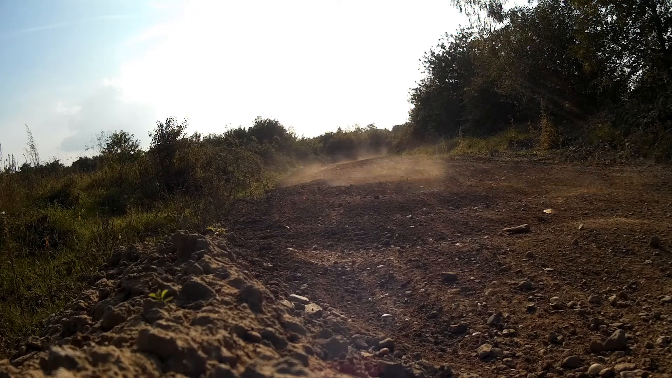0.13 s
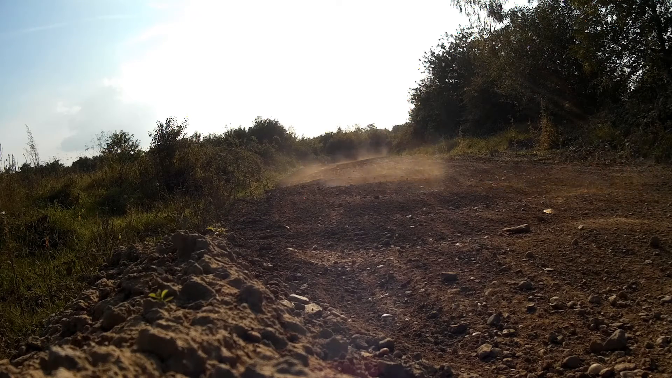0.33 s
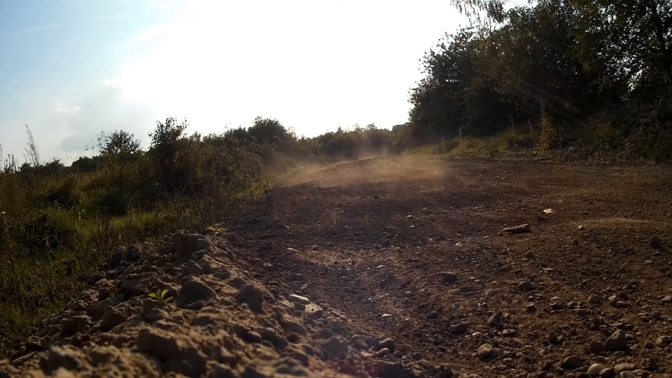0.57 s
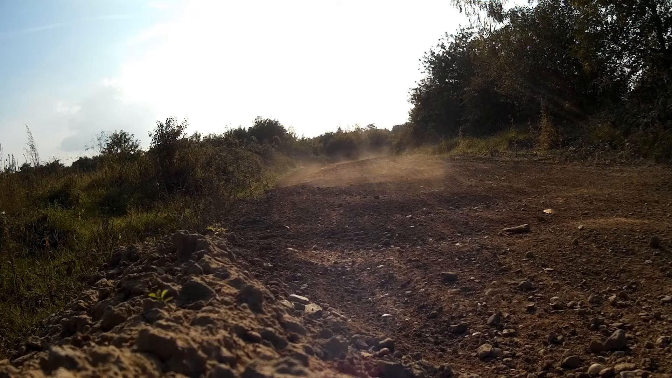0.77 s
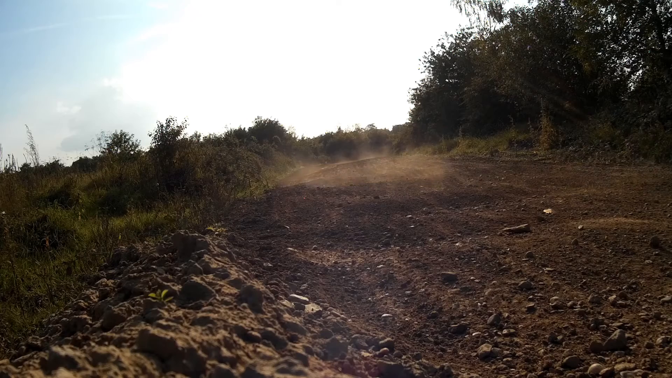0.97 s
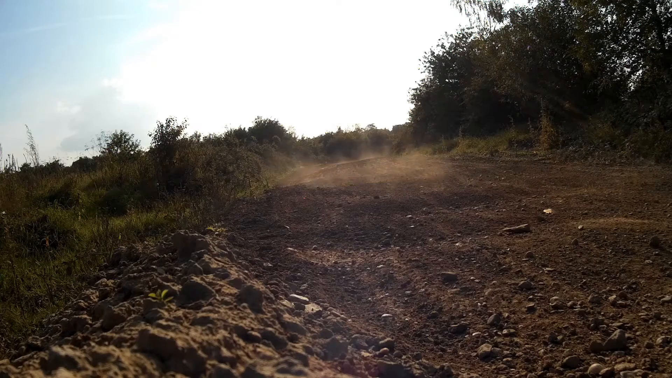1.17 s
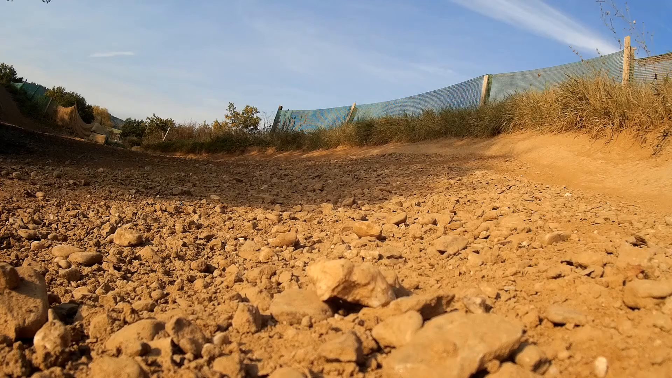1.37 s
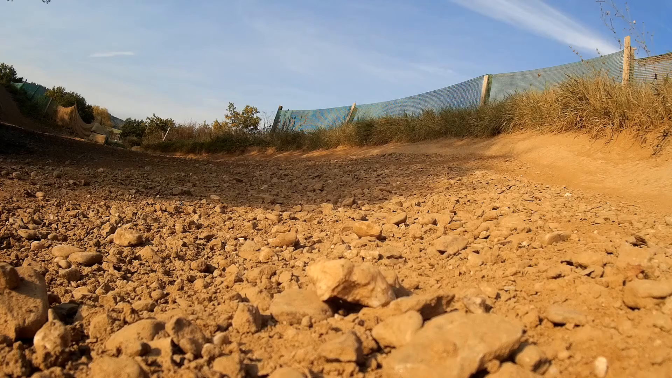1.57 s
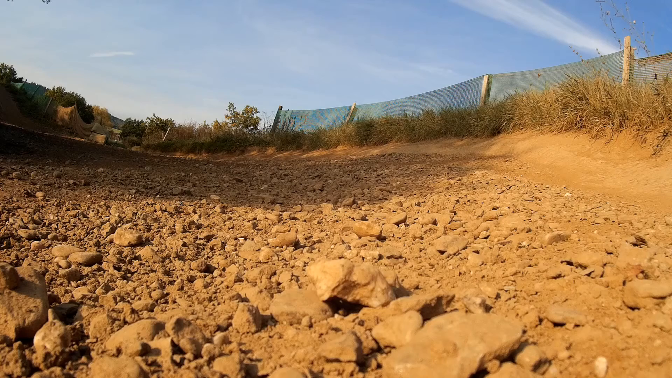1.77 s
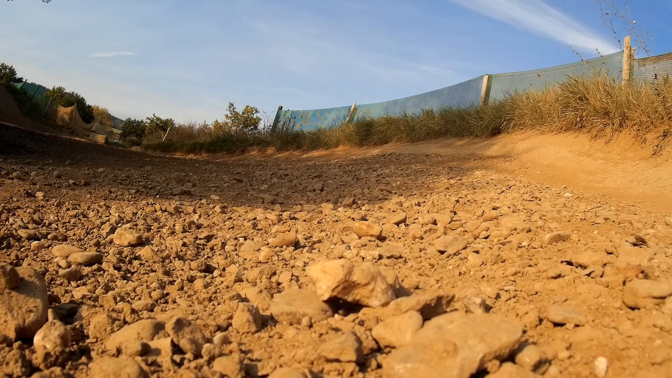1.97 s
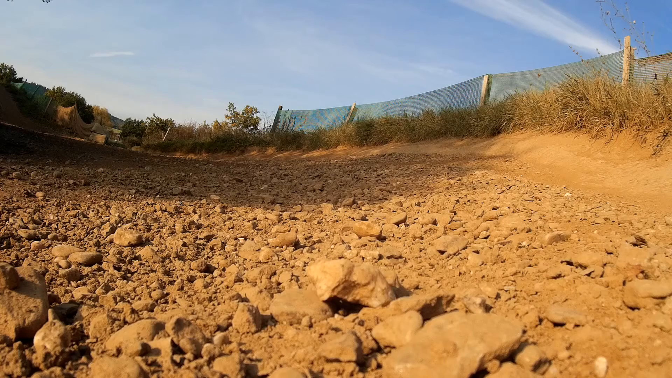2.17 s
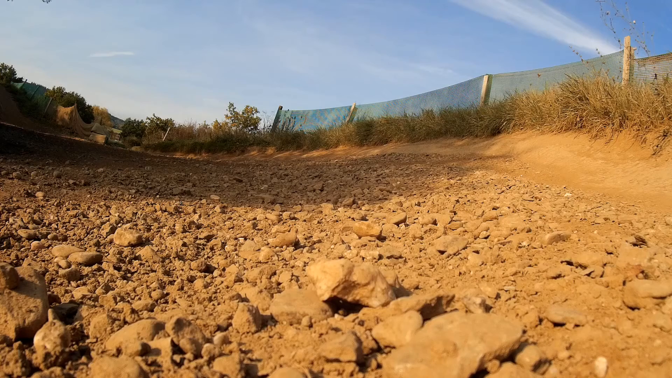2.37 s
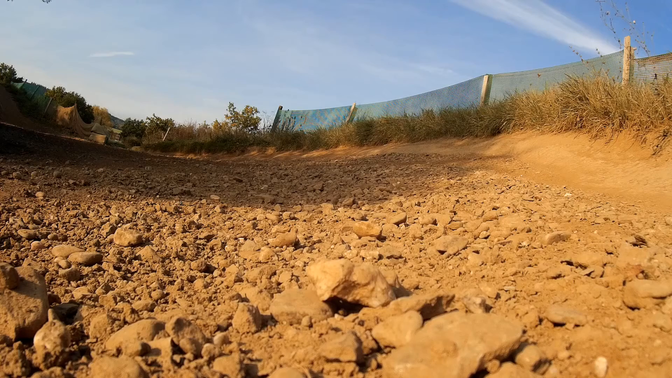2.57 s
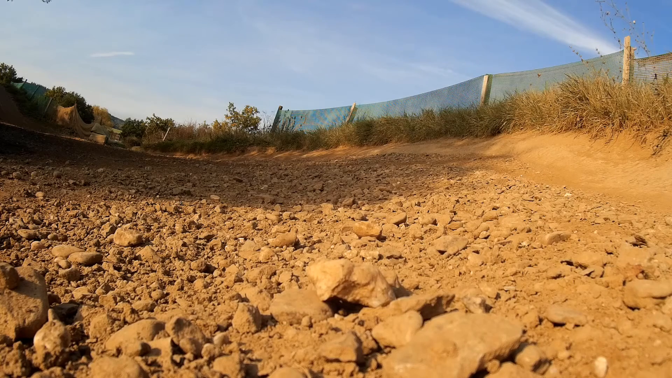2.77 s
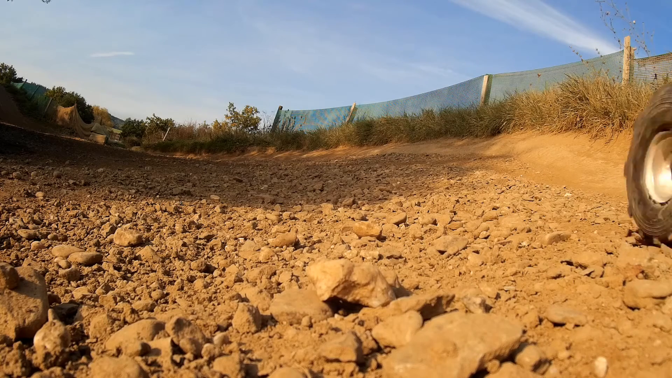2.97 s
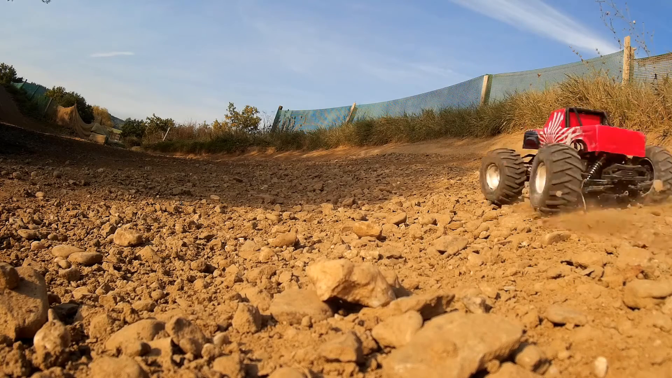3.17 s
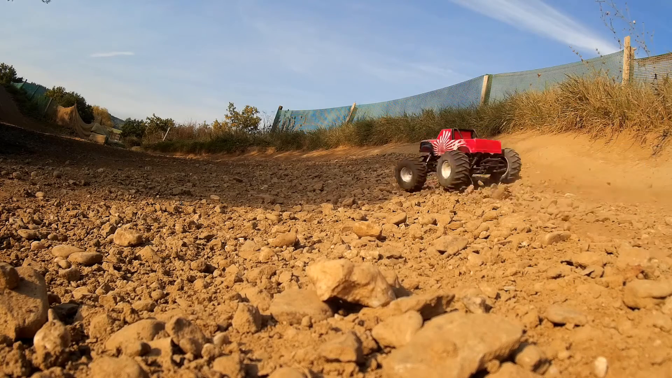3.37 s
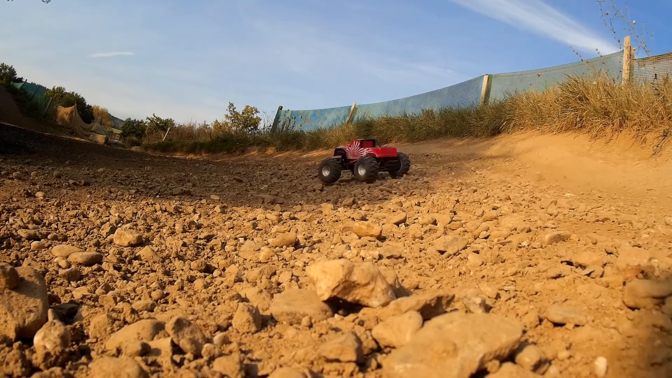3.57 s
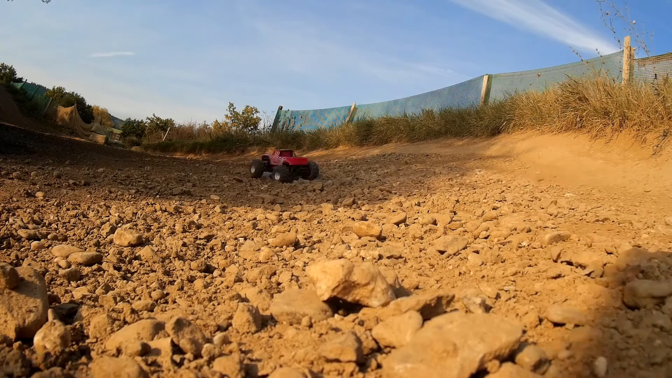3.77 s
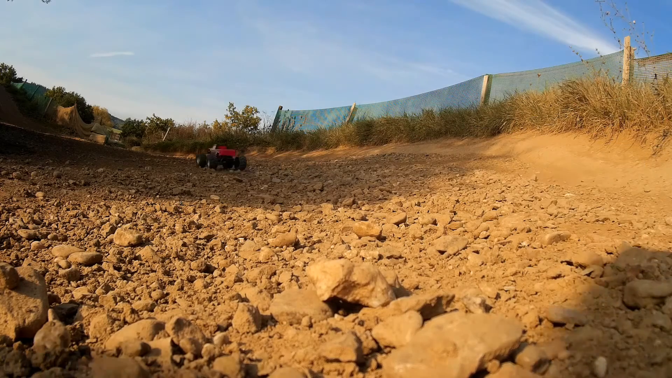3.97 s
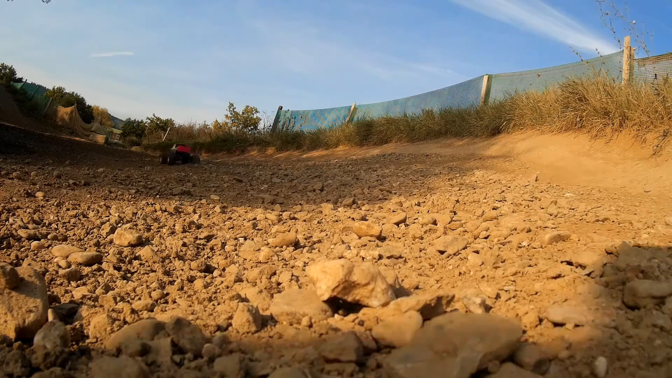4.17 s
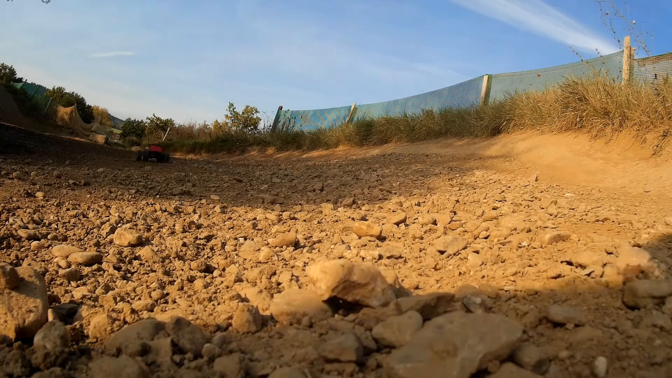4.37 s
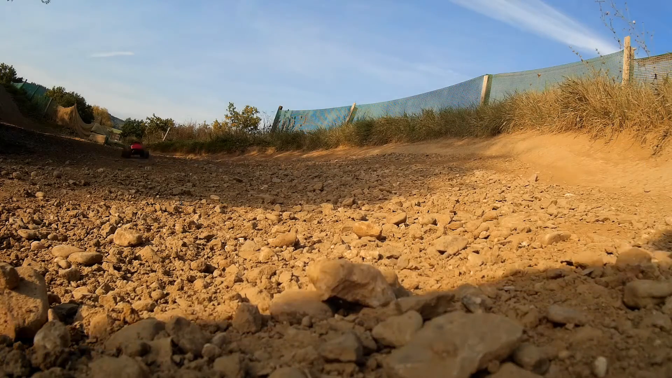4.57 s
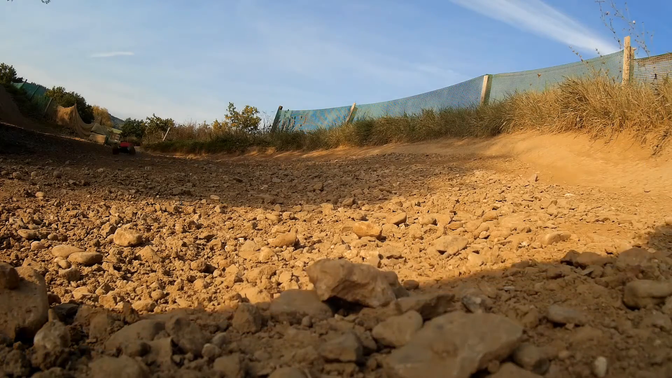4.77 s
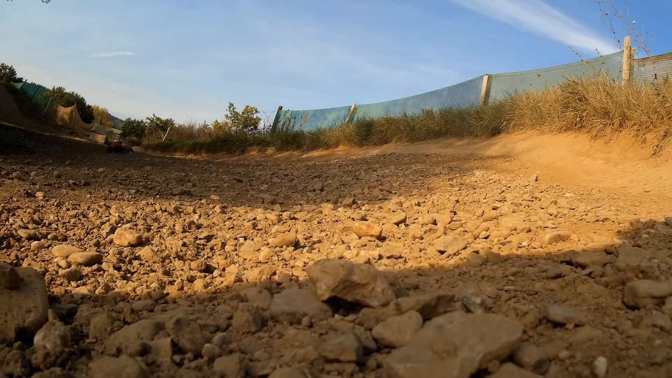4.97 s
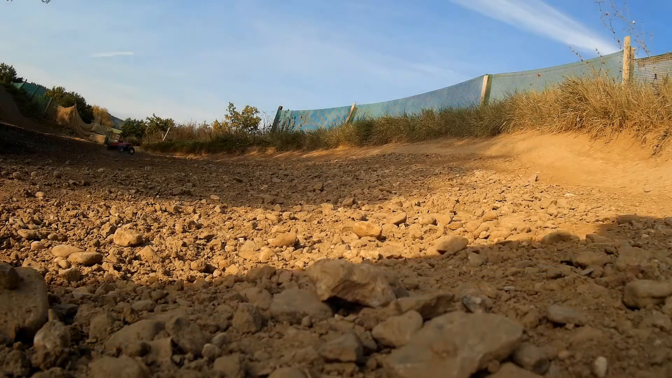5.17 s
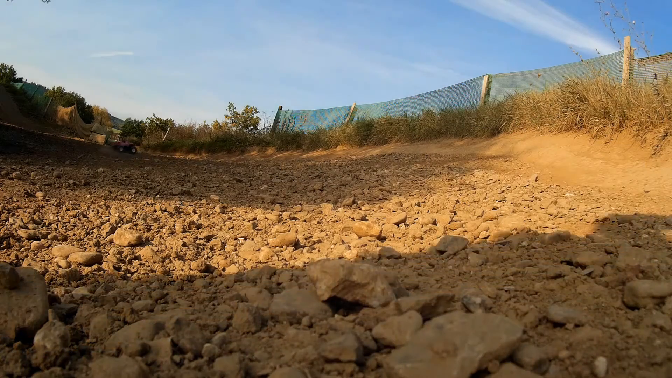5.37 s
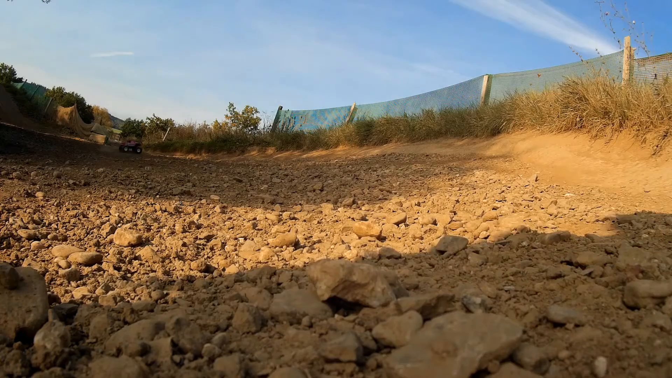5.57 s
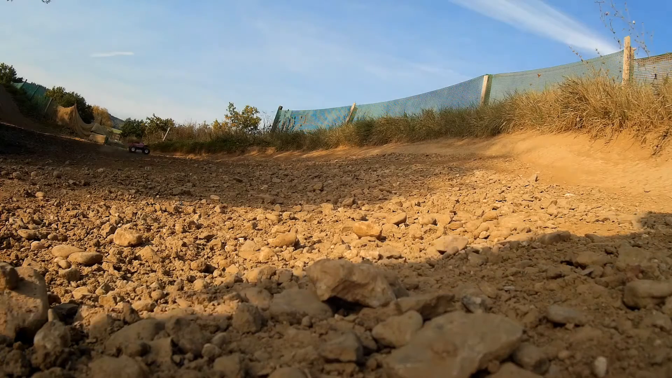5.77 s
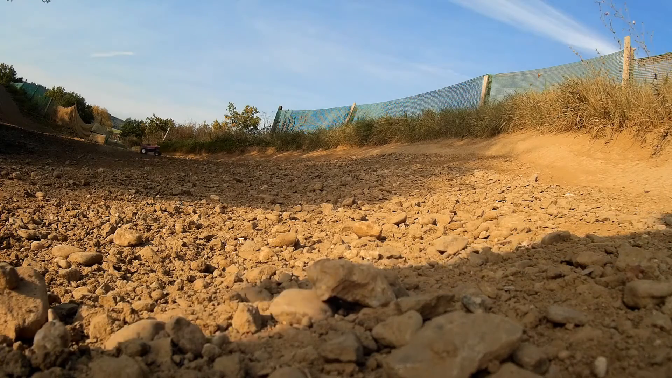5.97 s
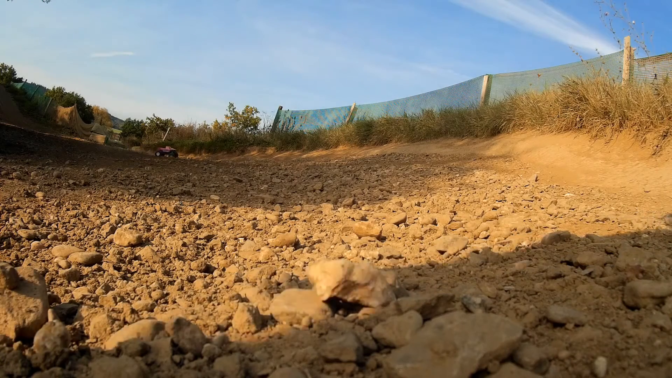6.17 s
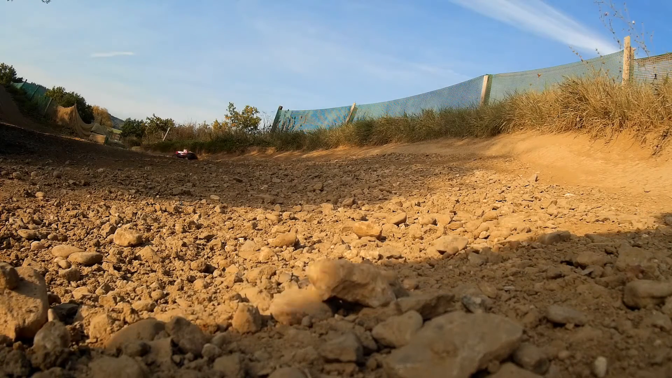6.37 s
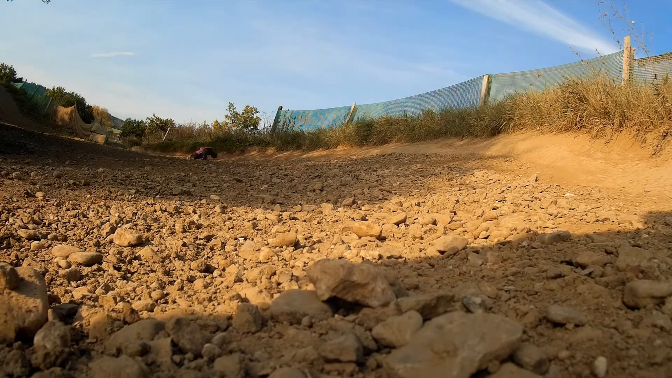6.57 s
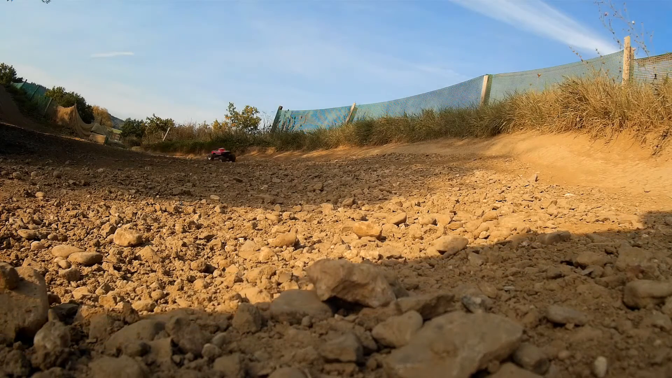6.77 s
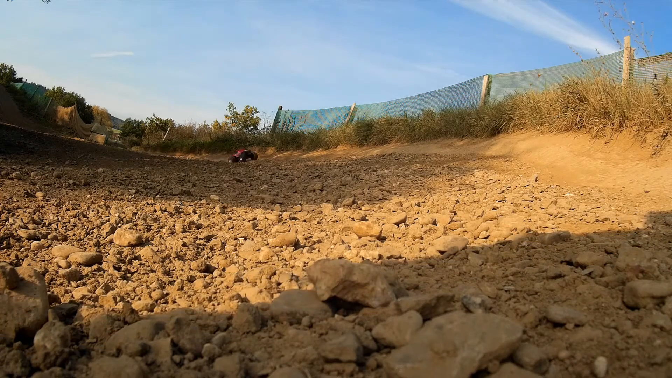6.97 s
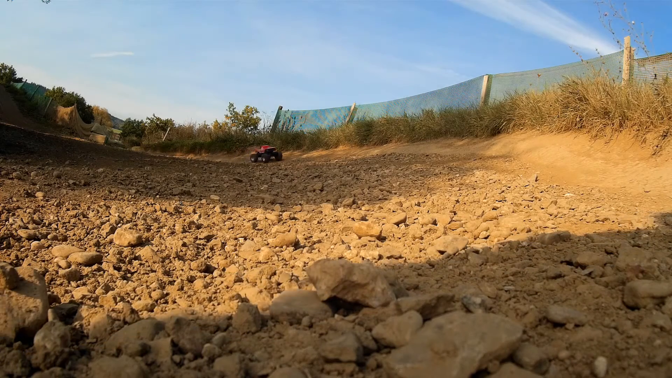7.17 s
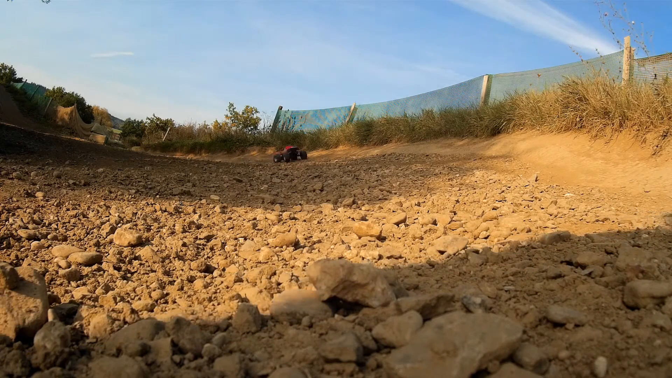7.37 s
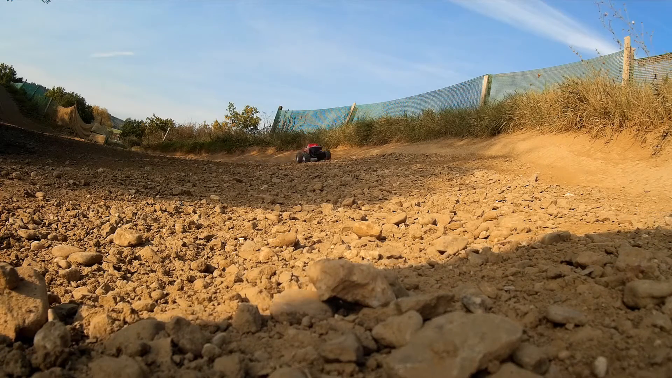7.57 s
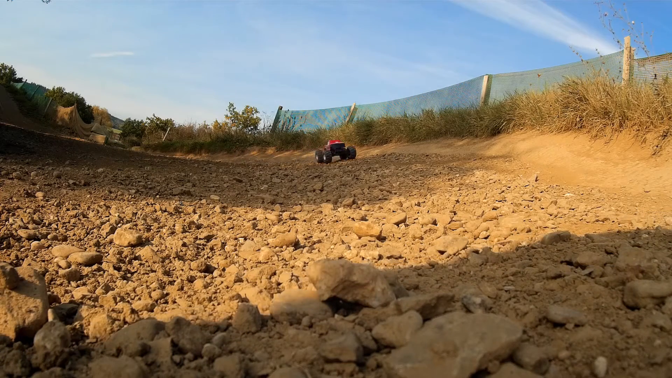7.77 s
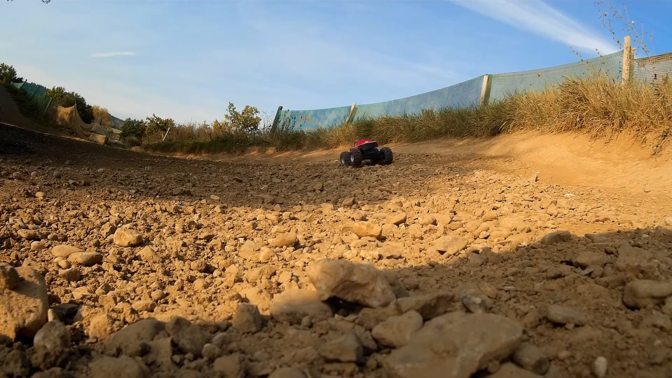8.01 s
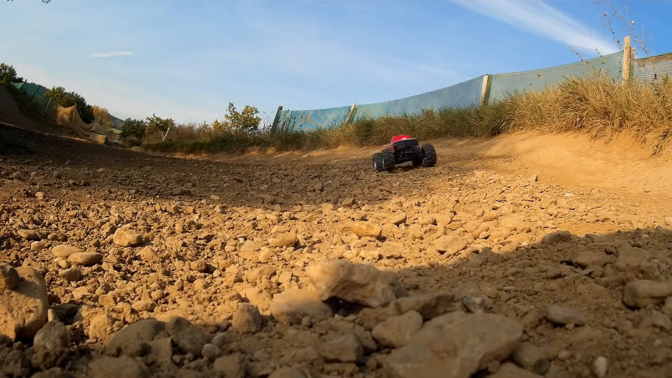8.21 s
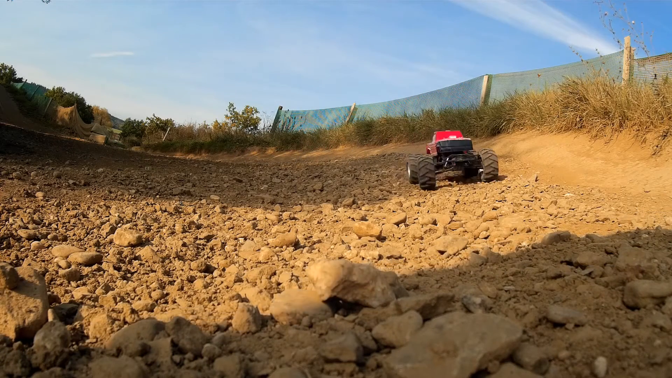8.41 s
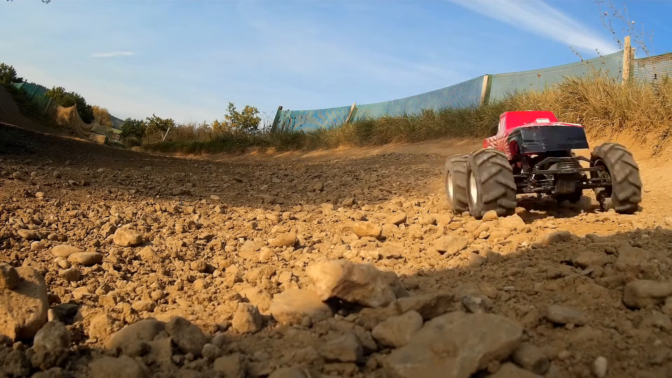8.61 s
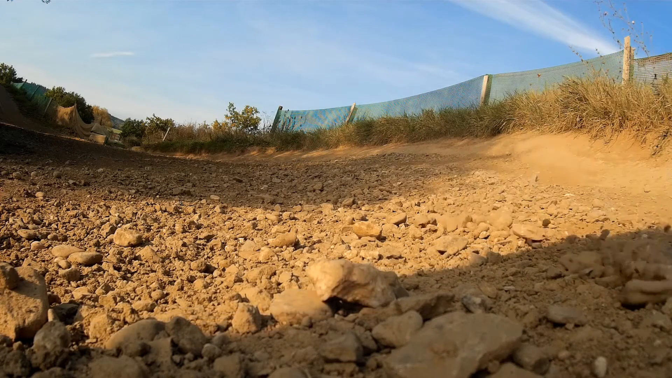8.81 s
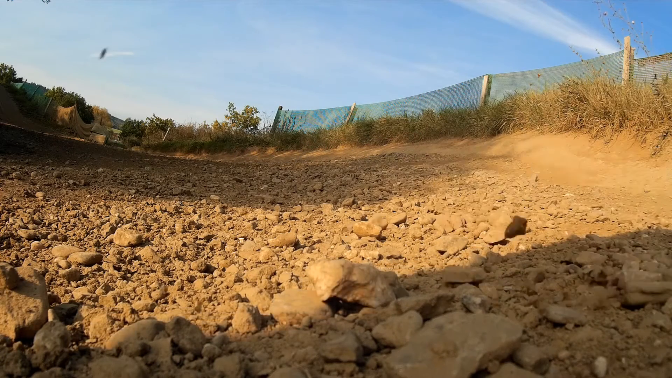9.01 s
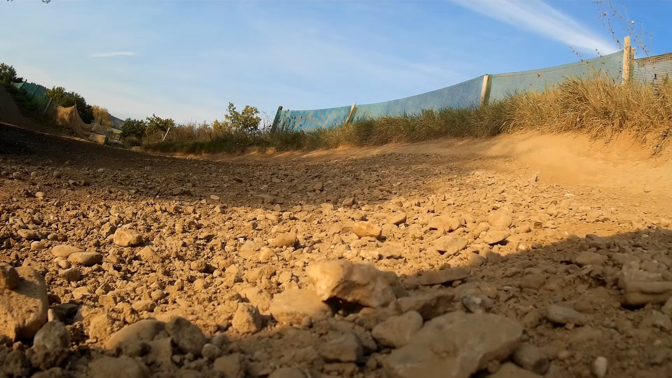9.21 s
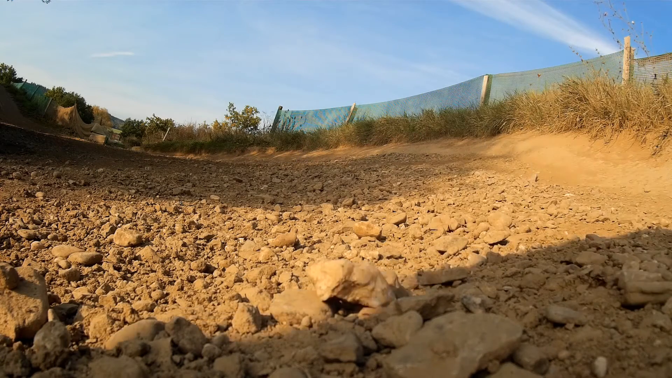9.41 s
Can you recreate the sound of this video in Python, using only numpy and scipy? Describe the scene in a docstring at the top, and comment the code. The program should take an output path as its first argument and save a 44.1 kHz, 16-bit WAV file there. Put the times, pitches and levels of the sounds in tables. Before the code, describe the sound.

Outdoor gravel track, mono microphone on the ground, its case giving the treble a coloured, boxy edge. From 0 to 1 s tyres of a small electric remote-control truck crunch softly away, fading to faint air and distant traffic. At 1.2 s an abrupt cut: the truck approaches with rumbling tyres, rattling plastic body and rough, high whining gears, revving near 1.7 and 2.1 s. It tears past at about 2.7-2.9 s, loud and slightly overloaded, with bright stone cracks at 3.0 and 3.2 s, landing thumps and pattering grit. It recedes by 4 s; the whine almost vanishes around 4.4-5.3 s, leaving distant crunch. Short low revs at 5.5 s climb to a high whine by 6.8 s as it returns. Crunch swells from 7.5 s, the whine eases, and the second pass bursts at 8.7 s with a heavy rumble, then revs, stone clicks and gravel as it leaves until 9.4 s.

```python
"""Tyres rumble and crunch over gravel, fading to near silence as a small electric radio-controlled truck rolls away.
After an abrupt change of place the truck races past, turns far off and comes back past again, now with whining gears.
Noise shaped by contact and distance makes the tyres, stones and grit; tones locked to the motor make the gears.
A case around the microphone, which lies on the ground, colours the treble; the closest passes overload it."""
import sys
import numpy as np
from scipy import signal
from scipy.fft import rfft, irfft
from scipy.io import wavfile
from scipy.ndimage import map_coordinates

SR = 44100
rng = np.random.default_rng(int(sys.argv[2]) if len(sys.argv) > 2 else 0)


def inscribe(sig):
    """Save sig as 16-bit PCM at rate SR to the path in sys.argv[1].

    A 1-D sig is mono; a 2-D sig holds one channel per row.
    Samples are clipped to [-1, 1] before scaling.
    """
    pcm = np.round(np.clip(np.atleast_2d(sig).T, -1, 1) * 32767)
    wavfile.write(sys.argv[1], SR, pcm.astype(np.int16))


N = 416744
TIME = np.arange(N) / SR
LAP_START_S = 1.19

# Path of the lap, a close pass, a far turn and a second close pass: (time [s], distance [m])
LAP_DISTANCE = [(1.2, 5.82), (1.75, 3.99), (2.38, 2.23), (2.6, 1.26), (2.73, 0.57), (2.9, 0.65),
                (3.1, 1.03), (3.75, 2.1), (4.0, 6), (4.7, 7.43), (5.15, 17.4), (5.95, 10.86), (6.6, 8),
                (7.5, 3.82), (8.25, 1.84), (8.72, 0.43), (8.9, 1.41), (9.45, 2.86)]
# How far the truck is behind the microphone: (time [s], share [0-1])
LAP_BEHIND = [(1.2, 0.75), (2.5, 0.95), (2.85, 0), (8.7, 0), (9.05, 1)]
# How squarely it drives towards the microphone after the turn: (time [s], share [0-1])
LAP_FACING = [(5.7, 0.01), (6.05, 0.5), (6.8, 0.99), (7.6, 1), (8.45, 0.01)]

# Tyres rolling away, common level before the balance below: (time [s], level [dB])
ROLLING_AWAY = [(0, -30), (0.17, -33), (0.23, -36.5), (0.55, -39), (0.75, -52.5), (1.0, -65)]
# Balance while rolling away: (rumble [dB], crunch [dB], clatter [dB], scraping [dB], spray [dB])
ROLLING_AWAY_BALANCE = (-2, 2, -9, -23.5, -22.5)
# Short swells (+) and dips (-) of the tyre sounds:
# (time [s], length [s], rumble [dB], gravel [dB], grit [dB])
TYRE_SWELLS = [(2.003, 0.19, -11, -6, 3), (2.174, 0.24, 2, 2, -1), (2.563, 0.26, -3, 0.5, 6),
               (2.888, 0.1, 0, 0, 5), (3.01, 0.32, 4, -1.5, -4), (3.14, 0.23, -2, -3, -2.5),
               (3.626, 1, 1, -2.5, 3.5), (4.539, 0.74, -3.5, -0.5, -4.5), (4.877, 0.16, -3, -5, -14),
               (5.528, 0.45, -0.5, 5, 9), (5.731, 0.18, -15, -3, 1), (5.999, 0.51, -2, 2.5, 4),
               (6.389, 1, -5, 0.5, -3.5), (6.874, 0.38, 0, 6.5, -1.5), (7.3, 0.31, -2, 2.5, -0.5),
               (7.798, 0.45, 0, -0.5, 1), (8.375, 0.17, -2, 1, 0), (8.665, 0.066, -4, 3.5, 5),
               (8.809, 0.082, 11, 1, 0), (8.972, 0.14, 14, 1.5, 0), (9.3, 0.36, 8.5, 1.5, -3),
               (9.408, 0.087, 8, 10.5, 5.5)]

# Radiation laws of the tyre sounds, the body shell and the landing grit: (level at 1 m [dB],
# change per doubling of distance [dB], when behind [dB], when facing [dB], per octave of motor speed [dB])
RUMBLE_LAW = (-22, -7, -2.5, -6, -3)
CRUNCH_LAW = (-15, -6.5, -1.5, -2, 3)
CLATTER_LAW = (-20.5, -8, 4, -12, -2.5)
SCRAPE_LAW = (-32.5, -14, 14, 6, 2)
SPRAY_LAW = (-27.5, -8, -3, 3, 5.5)
SHELL_LAW = (-30, -4, -10.5, 1.5, 0.5)
PATTER_LAW = (-43, -6, -4, -3.5, 8)
# Radiation laws of the gear tones (columns as above)
PINION_LAW = (-24.5, -7, -1, -5, -1)
OVERTONES_LAW = (-35.5, -5, -0.5, 0.5, 5.5)
SLOW_GEAR_LAW = (-26, -8.5, 11, -10, 13.5)
IDLER_LAW = (-42, -10, 16, -1, 0)
# Spectral centre of crunch and clatter: (centre at 1 m [Hz], shift per doubling of distance [octaves],
# when behind [octaves], when facing [octaves])
CRUNCH_CENTRE = (710, -0.18, 0.68, -0.66)
CLATTER_CENTRE = (1530, -0.07, 0.33, 0.04)
# Top octave of the spray: (level at 1 m [dB], change per doubling of distance [dB],
# when behind [dB], when facing [dB]), and its upper limit [dB]
SPRAY_TOP_LAW, SPRAY_TOP_MOST_DB = (-6, 7, -12.5, -0.5), 7
# Resonance of the body shell: (centre [Hz], width [Hz])
SHELL_MODE = (769, 237)

# Motor speed between the revs: (time [s], pinion mesh rate [Hz])
MESH_RATE = [(1.2, 3000), (2.25, 3030), (2.55, 3420), (2.85, 3520), (3.2, 3780), (3.95, 3850), (5.35, 1197),
             (5.77, 1260), (5.89, 1970), (6.27, 2400), (6.76, 3980), (6.95, 3440), (7.1, 3780), (7.6, 3860),
             (8.6, 3710), (8.76, 4600), (8.92, 4700), (9.05, 3650)]
# Short revs: (time [s], length [s], rise of the mesh rate [Hz], change of load [dB])
MOTOR_REVS = [(1.7, 0.32, 397.9, -1), (2.07, 0.27, 900, -11), (2.664, 0.27, 599.6, -3.5),
              (2.976, 0.18, 282.4, -1), (5.508, 0.094, 257, 1.5), (5.64, 0.13, 250, 5),
              (7.21, 0.22, 758.5, -6), (8.868, 0.1, 608, 1), (9.149, 0.18, 499, 12), (9.339, 0.16, 894, -9)]
# Load on the gears, low while coasting into the turn: (time [s], level [dB])
GEAR_LOAD = [(1.2, -6), (1.53, -2), (1.75, -11), (1.88, 3), (2.1, -1), (2.55, -1), (2.8, 5), (3.15, 2),
             (3.8, -11.5), (4.35, -30.5), (5.28, -29), (5.39, 3.5), (5.83, 0.5), (6.0, -7), (6.5, -1.5),
             (7.35, 3.5), (7.8, -18), (8.55, -22), (8.77, -0.5), (9.05, -15), (9.3, -22)]
# Overtones of the pinion: (multiple of the mesh rate, level [dB])
MESH_OVERTONES = [(1.5, -10), (2, -1.5), (2.5, -20), (3, -5.5), (4, -12.5)]
# Transmission of the pinion tone through the case: (frequency [Hz], level [dB])
PINION_TRANSMISSION = [(1200, -1.5), (1550, 8), (2000, -17), (2600, -13), (3100, -8.5), (3600, -0.5),
                       (4200, -1), (4700, -2), (5100, -14)]
# Switching tone of the speed controller at part throttle: (start [s], end [s], level [dB])
CONTROLLER_TONE = [(1.202, 2.701, -63), (5.296, 6.4, -71)]

# Stones flicked by the tyres: (time [s], peak level [dB], ring [Hz], decay by 60 dB [s])
FLICKED_STONES = [(1.04, -41, 980, 0.025), (1.101, -20.5, 1065, 0.0083), (1.717, -16.5, 1290, 0.016),
                  (2.991, -0.5, 4100, 0.011), (3.219, 2, 5160, 0.0081), (3.35, -12, 4350, 0.02),
                  (4.93, -36.5, 1505, 0.031), (5.564, -29.5, 1680, 0.041), (5.584, -33, 1774, 0.038),
                  (6.529, -25, 990, 0.03), (9.105, -20, 4240, 0.016), (9.178, -17.5, 5627, 0.03)]
# Wheels landing on bumps: (time [s], peak level before the common trim [dB])
WHEEL_LANDINGS = [(0.052, -19), (1.377, -19), (1.421, -14), (1.799, -10.5), (2.124, -6), (3.294, -1),
                  (3.446, -2.5), (3.643, -8), (3.709, -12), (3.768, -6.5), (5.613, -21), (6.221, -23.5),
                  (6.498, -21), (6.889, -27), (7.222, -21), (7.567, -21), (7.808, -11), (7.916, -13),
                  (9.383, -8)]

# Resonances of the microphone's case: (centre [Hz], width [Hz], level [dB])
CASE_RESONANCES = [(3810, 910, 6.5), (5480, 780, 4), (5880, 170, -3), (7850, 1260, -5.5), (9710, 980, -1),
                   (12060, 1100, -13), (14600, 2100, -13)]
# Dead spots of the case: (centre [Hz], width [Hz], share removed [0-1])
CASE_DEAD_SPOTS = [(2605, 1400, 1), (6790, 810, 0.35), (9600, 450, 0.14), (10880, 600, 0.6),
                   (13350, 410, 0.37)]
# Spectrum of still air and distant traffic: (frequency [Hz], relative level per Hz [dB])
AIR_SPECTRUM = [(15, -46.5), (25, -9), (38, 0), (59, -3.5), (73, -7), (88, -23.5), (271, -38.5), (529, -25),
                (2700, -37.5), (15000, -42)]


def tyres(truck):
    """Common excitation: rubber thuds, gravel, chassis clatter and grit all follow the same tyre load."""
    rumble_db, crunch_db, clatter_db, scrape_db, spray_db = tyre_levels(truck)
    leaving = TIME < LAP_START_S
    crunch_hz = np.where(leaving, 542.8, heard_hz(CRUNCH_CENTRE, truck))
    clatter_hz = np.where(leaving, 1610.4, heard_hz(CLATTER_CENTRE, truck))
    top_db = np.where(leaving, -8, np.minimum(heard_db(SPRAY_TOP_LAW, truck), SPRAY_TOP_MOST_DB))
    load = jolts(per_s=75, decay_s=0.014, depth=0.67)

    rumble = rms_one(band(grains(per_s=800, spread_db=1, smooth_share=0.71), 102, 362))
    shudder = rms_one(band(rng.standard_normal(N), 41, 120))

    crunch = band(grains(per_s=1500, spread_db=2.5, smooth_share=0.39), 330, 1190)
    crunch = glide(below(crunch, 1660, order=6), crunch_hz / 700)
    clatter = band(grains(per_s=1600, spread_db=2.5, smooth_share=0.59), 1157, 1825, order=3)
    clatter = glide(below(clatter, 2295, order=8), clatter_hz / 1550)

    scrape = rms_one(band(grains(per_s=2900, spread_db=5, smooth_share=0.35), 1860, 2950))
    scrape_top = rms_one(band(grains(per_s=1400, spread_db=3.6, smooth_share=0.46), 3300, 5000))
    spray = rms_one(case(grains(per_s=3400, spread_db=1, smooth_share=0.49), leak=0.053))
    spray_body = signal.sosfiltfilt(signal.butter(4, 11000, fs=SR, output="sos"), spray)
    # the top octave has its own level, weaker when the truck is behind
    spray = spray_body + from_db(top_db) * (spray - spray_body)

    heavy = from_db(rumble_db) * (rumble + from_db(-18) * shudder)
    heavy = heavy + from_db(crunch_db) * crunch + from_db(clatter_db) * clatter
    grit = from_db(scrape_db) * (scrape + from_db(-11) * scrape_top) + from_db(spray_db) * spray
    # the load swings the heavy sounds fully, the loose grit less
    return heavy * load + grit * load ** 0.65


def tyre_levels(truck):
    """Source strength: motion and short swells set rumble, crunch, clatter, scraping and spray [dB]."""
    thud, gravel, grit = sum(np.outer(db, swell(s, length_s)) for s, length_s, *db in TYRE_SWELLS)
    lap = [heard_db(RUMBLE_LAW, truck) + thud,
           heard_db(CRUNCH_LAW, truck) + gravel,
           heard_db(CLATTER_LAW, truck) + gravel,
           heard_db(SCRAPE_LAW, truck) + grit,
           heard_db(SPRAY_LAW, truck) + grit]
    leaving = in_time(ROLLING_AWAY) + np.array(ROLLING_AWAY_BALANCE)[:, None]
    return np.where(TIME < LAP_START_S, leaving, lap)


def gears(truck, sideband_db=-5, teeth_count=20):
    """Gear meshing: each tooth contact is one cycle, modulated once a turn of the pinion."""
    mesh_hz = motor_hz()
    pinion_db, overtone_db, slow_gear_db = gear_levels(truck, mesh_hz)
    # bouncing wheels shake the speed; slow gears run cleaner
    shake = np.clip(mesh_hz / 3000, 0, 1)
    wobble = shake * (.011 * drift(80) + .003 * drift(14))
    phase = 2 * np.pi * np.cumsum(mesh_hz * (1 + wobble)) / SR
    shaft = np.cos(phase / teeth_count)

    def partial(k):
        """Modulation: shaft sidebands flank each order; uneven tooth contact smears high orders most."""
        smear_hz = 45 + 60 * k ** 2
        clean = min(1.5, 1.5 / k ** 2)
        tone = np.sin(k * phase)
        scatter = drift(smear_hz) * tone + drift(smear_hz) * np.cos(k * phase)
        flanks = 2 * drift(smear_hz) * shaft * tone
        rough = shake * (scatter + from_db(sideband_db) * flanks)
        return rms_one((clean * tone + rough) / np.sqrt(clean ** 2 + 2 * shake ** 2))

    overtones = case(sum(from_db(db) * partial(k) for k, db in MESH_OVERTONES), leak=0.1)
    whine = from_db(pinion_db) * partial(1.0) + from_db(overtone_db) * overtones
    whine = whine + from_db(slow_gear_db) * partial(0.46)
    # a rough idler tone, heard mostly from behind
    whine = whine + from_db(heard_db(IDLER_LAW, truck)) * partial(0.64)
    # the tyres grip and slip
    torque = rms_one(from_db(2.6 * drift(22)))
    part_throttle = sum(from_db(db) * ((TIME > start) & (TIME < end)) for start, end, db in CONTROLLER_TONE)
    switching = part_throttle * rms_one(resonate(rng.standard_normal(N), hz=8080, width_hz=45))
    return (whine * torque + switching) * (TIME > LAP_START_S)


def gear_levels(truck, mesh_hz, slow_gear_follows=0.86):
    """Load dependence: pinion, overtones and slow gear [dB] are louder when near and under load."""
    load_db = in_time(GEAR_LOAD)[0] + sum(db * swell(s, length_s) for s, length_s, _, db in MOTOR_REVS)
    path_db = np.interp(mesh_hz, *np.transpose(PINION_TRANSMISSION))
    return (heard_db(PINION_LAW, truck) + load_db + path_db,
            heard_db(OVERTONES_LAW, truck) + load_db,
            heard_db(SLOW_GEAR_LAW, truck) + slow_gear_follows * load_db)


def motor_hz():
    """Rotation: the pinion's mesh rate is the running speed plus the revs."""
    revs = sum(rise_hz * swell(s, length_s) for s, length_s, rise_hz, _ in MOTOR_REVS)
    return in_time(MESH_RATE)[0] + revs


def shell(truck):
    """Forced resonance: gravel shakes the thin plastic body, which booms around one frequency."""
    shaking = grains(per_s=550, spread_db=0.5, smooth_share=0.32) * jolts(per_s=40, decay_s=0.015, depth=0.62)
    hz, width_hz = SHELL_MODE
    ring = rms_one(resonate(resonate(shaking, hz, width_hz), hz, 2 * width_hz))
    gravel_db = sum(db * swell(s, length_s) for s, length_s, _, db, _ in TYRE_SWELLS)
    return from_db(heard_db(SHELL_LAW, truck) + gravel_db) * ring * (TIME > LAP_START_S)


def bumps(t60=0.058, trim_db=-3.5):
    """Damped impact: a landing wheel gives a short, dull crunch."""
    out = np.zeros(N)
    for s, peak_db in WHEEL_LANDINGS:
        add(out, s, peak_db + trim_db, below(band(burst(t60), 230, 1100), 1400, order=6))
    return out


def stones(crack_share=0.033):
    """Impulse response: a flicked stone gives a brief wide crack and one broad, decaying ring."""
    out = np.zeros(N)
    for s, peak_db, hz, t60 in FLICKED_STONES:
        ring = band(burst(t60), hz * 0.81, hz * 1.136)
        crack = band(burst(t60 / 2), hz * 0.5, hz)
        add(out, s, peak_db, ring + crack_share * crack)
    return out


def patter(truck, per_s=90, spread_db=11, flight_s=0.15):
    """Delayed random impacts: thrown grains land after their flight with tiny bright ticks."""
    sizes = from_db(spread_db * np.minimum(rng.exponential(1, N), 3))
    landings = (rng.random(N) < per_s / SR) * sizes
    # each landing is a few quick contacts
    envelope = signal.lfilter([1], [1, -np.exp(-1 / (0.0009 * SR))], landings + 1e-18)
    contacts = envelope * rng.standard_normal(N)
    ticks = rms_one(case(np.diff(contacts, prepend=0), leak=0.15))
    level_db = np.interp(TIME - flight_s, TIME, heard_db(PATTER_LAW, truck))
    return from_db(level_db) * (TIME > LAP_START_S) * ticks


def air(level_db=-54.5):
    """Stationary noise: still air and distant traffic have a steady, coloured spectrum."""
    hz, db = np.transpose(AIR_SPECTRUM)
    colour = from_db(np.interp(np.log(np.fft.rfftfreq(N, 1 / SR) + 1), np.log(hz), db))
    return from_db(level_db) * rms_one(irfft(rfft(rng.standard_normal(N)) * colour, N))


def motion():
    """Kinematics: doublings of distance, share behind, share facing and octaves of motor speed."""
    metres = np.maximum(in_time(LAP_DISTANCE)[0], .1)
    cruise_hz = 3800
    return np.array([np.log2(metres), in_time(LAP_BEHIND)[0], in_time(LAP_FACING)[0],
                     np.log2(motor_hz() / cruise_hz)])


def heard_db(law, truck):
    """Spreading and directivity: the level at 1 m changes with the truck's place and motion."""
    return law[0] + sum(slope * control for slope, control in zip(law[1:], truck))


def heard_hz(law, truck):
    """Spectral shift: the centre at 1 m moves with the truck's place."""
    return law[0] * 2 ** sum(slope * control for slope, control in zip(law[1:], truck))


def case(x, leak):
    """Resonant transmission: treble passes mostly through the modes of the microphone's case."""
    out = sum(from_db(db) * resonate(x, hz, width) for hz, width, db in CASE_RESONANCES)
    out = out + leak * band(x, 3000, 17000)
    for hz, width, share in CASE_DEAD_SPOTS:
        out = out - share * resonate(out, hz, width)
    return out


def grains(per_s, spread_db, smooth_share):
    """Granular contact: random clicks of uneven size over a wash of countless tiny ones."""
    sizes = from_db(spread_db * np.minimum(rng.exponential(1, N), 4)) * rng.choice([-1, 1], N)
    clicks = rms_one(sizes * (rng.random(N) < per_s / SR))
    return np.sqrt(1 - smooth_share) * clicks + np.sqrt(smooth_share) * rng.standard_normal(N)


def jolts(per_s, decay_s, depth):
    """Relaxation: tyre load jumps at random stones, softened by the rubber, and decays; rms 1."""
    kicks = (rng.random(N) < per_s / SR) * rng.uniform(0.67, 1, N)
    relaxing = signal.lfilter([1], [1, -np.exp(-1 / (decay_s * SR))], kicks + 1e-18)
    return rms_one(1 + depth * below(relaxing, 220))


def burst(t60):
    """Exponential decay: a short crush of grit falls by 60 dB in `t60` seconds."""
    age = TIME[:SR // 4]
    return rng.standard_normal(len(age)) * from_db(-60 * age / t60)


def drift(rate_hz):
    """Band-limited chance: a smooth random curve of rms 1, held over every four samples."""
    slow = below(rng.standard_normal(N // 4 + 2000), 4 * rate_hz)[1000:]
    return np.repeat(rms_one(slow), 4)[:N]


def glide(x, ratio):
    """Frequency scaling: reading a texture faster or slower slides its whole spectrum by `ratio`."""
    return rms_one(map_coordinates(x, [np.cumsum(ratio) % (N - 1)], order=3))


def swell(s, length_s):
    """Raised-cosine window: a smooth rise to 1 and fall, centred on a moment."""
    out = np.zeros(N)
    start, end = np.searchsorted(TIME, [s - length_s / 2, s + length_s / 2])
    out[start:end] = np.cos(np.pi * (TIME[start:end] - s) / length_s) ** 2
    return out


def resonate(x, hz, width_hz):
    """Damped oscillator: one resonance with unit gain on top."""
    r = np.exp(-np.pi * width_hz / SR)
    return signal.lfilter(np.array([1, 0, -1]) * (1 - r * r) / 2,
                          [1, -2 * r * np.cos(2 * np.pi * hz / SR), r * r], x)


def band(x, low_hz, high_hz, order=2):
    """Band limitation: a Butterworth band-pass."""
    return signal.sosfilt(signal.butter(order, [low_hz, high_hz], "band", fs=SR, output="sos"), x)


def below(x, hz, order=2):
    """Treble loss: a Butterworth low-pass."""
    return signal.sosfilt(signal.butter(order, hz, fs=SR, output="sos"), x)


def add(track, s, peak_db, sound):
    """Superposition: mix a sound in at a time and peak level."""
    start = round(s * SR)
    track[start:start + len(sound)] += (from_db(peak_db) * sound / np.abs(sound).max())[:N - start]


def in_time(rows):
    """Linear interpolation: each column of a curve at every sample."""
    s, *columns = np.transpose(rows)
    return np.array([np.interp(TIME, s, c) for c in columns])


def from_db(db):
    """Logarithmic level: decibels to amplitude gain."""
    return 10 ** (np.asarray(db) / 20)


def rms_one(x):
    """Mean power: scale to unit rms."""
    return x / np.sqrt(np.mean(x ** 2) + 1e-20)


def scene():
    """Superposition of the truck's sounds and the open air, in mono."""
    truck = motion()
    vehicle = tyres(truck) + gears(truck) + shell(truck)
    impacts = bumps() + stones() + patter(truck)
    return (vehicle + impacts + air())[None]


def record(dry):
    """Saturation: the closest passes overload the microphone; a steep filter cuts the top."""
    squashed = dry / (1 + dry ** 6) ** (1 / 6)
    return signal.sosfilt(signal.ellip(10, .1, 80, 15000, fs=SR, output="sos"), squashed)


dry = scene()
out = record(dry)
inscribe(out)
```